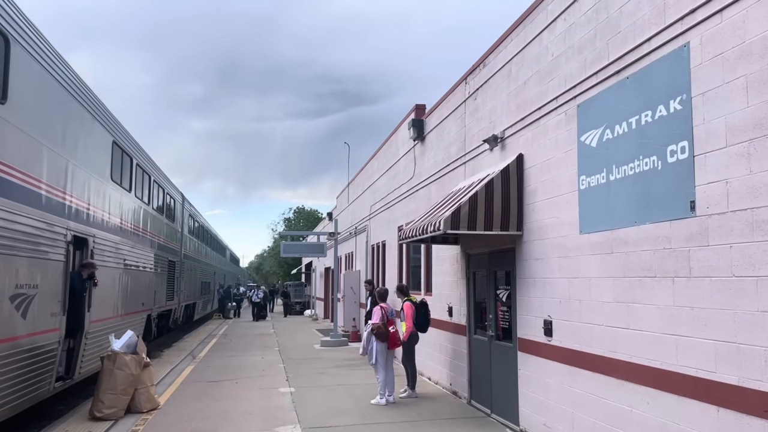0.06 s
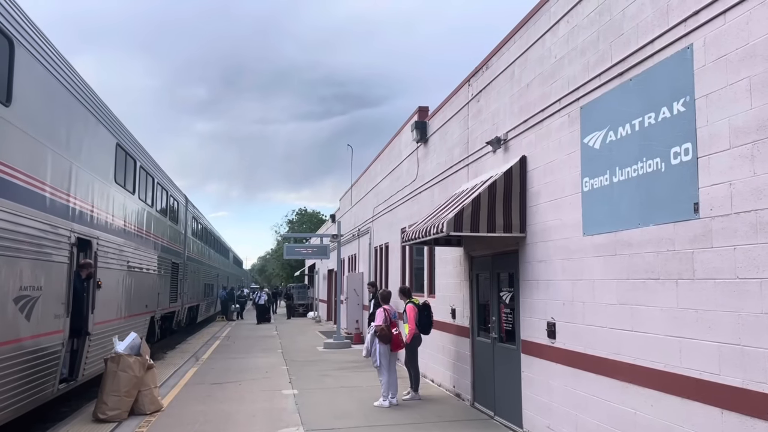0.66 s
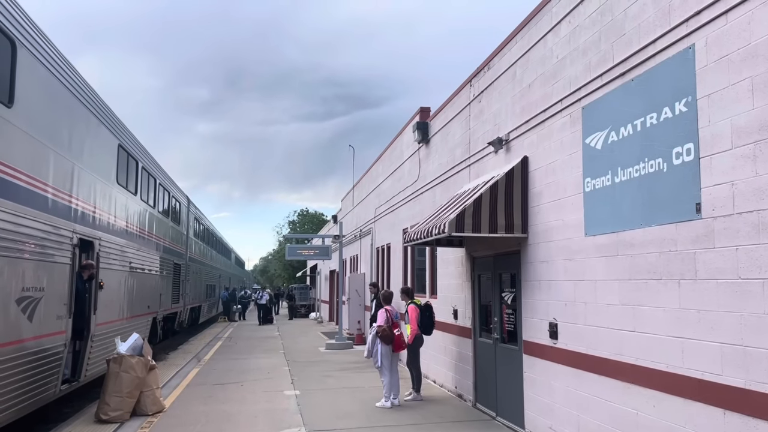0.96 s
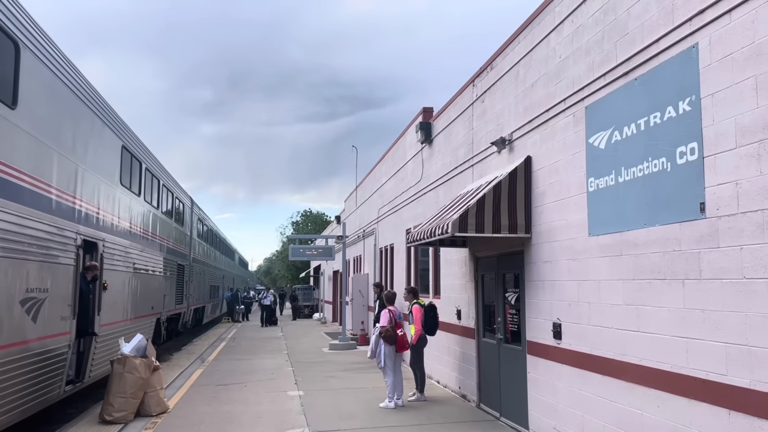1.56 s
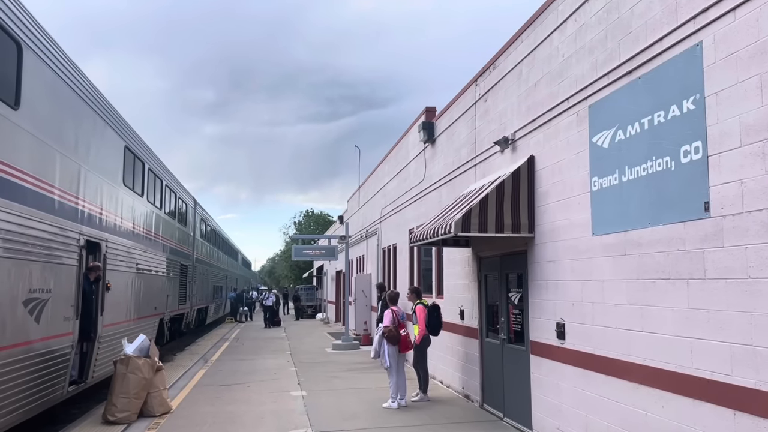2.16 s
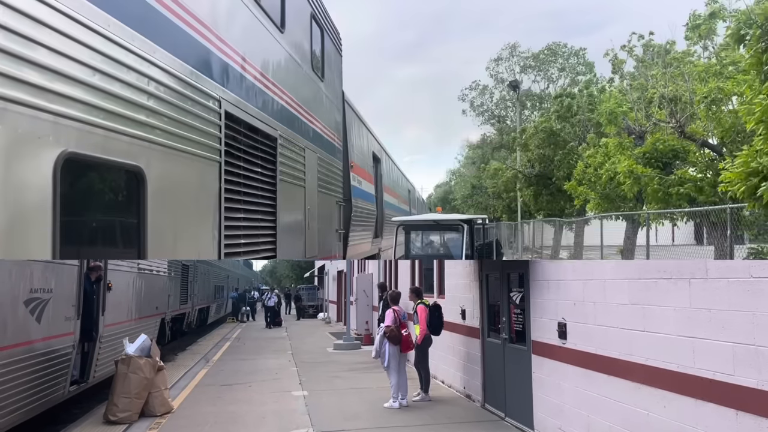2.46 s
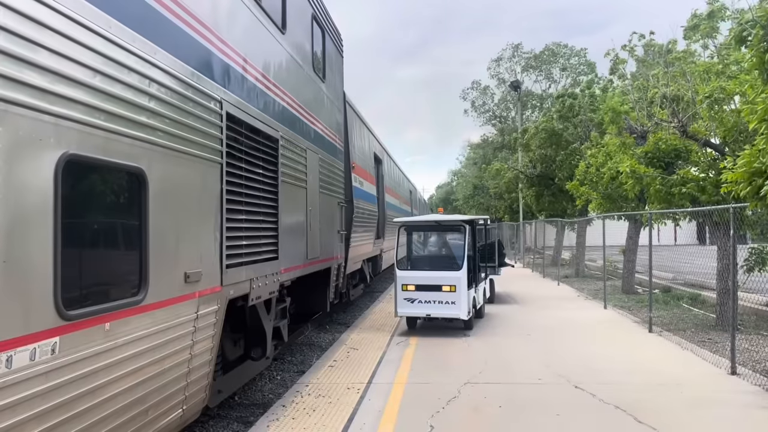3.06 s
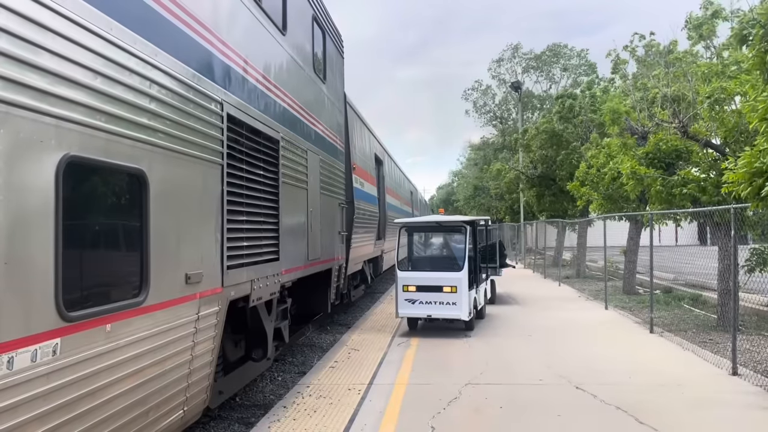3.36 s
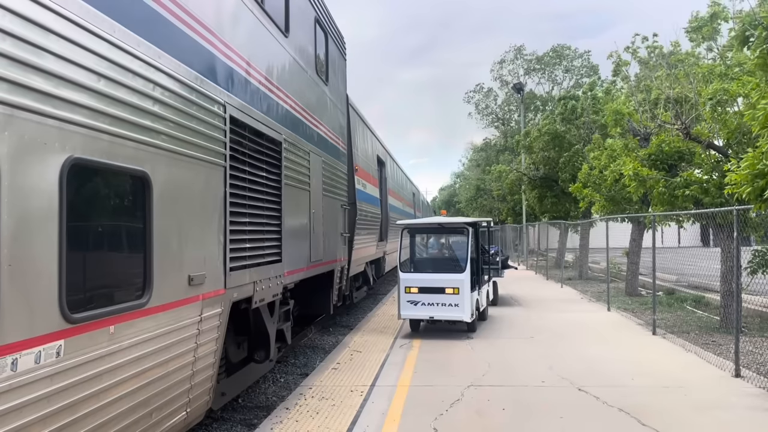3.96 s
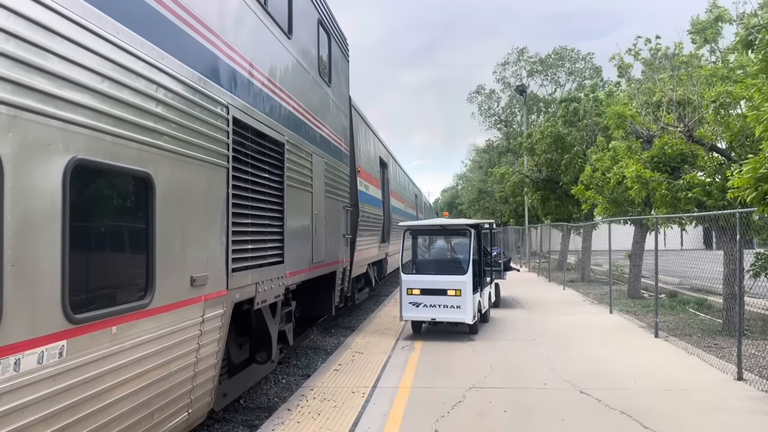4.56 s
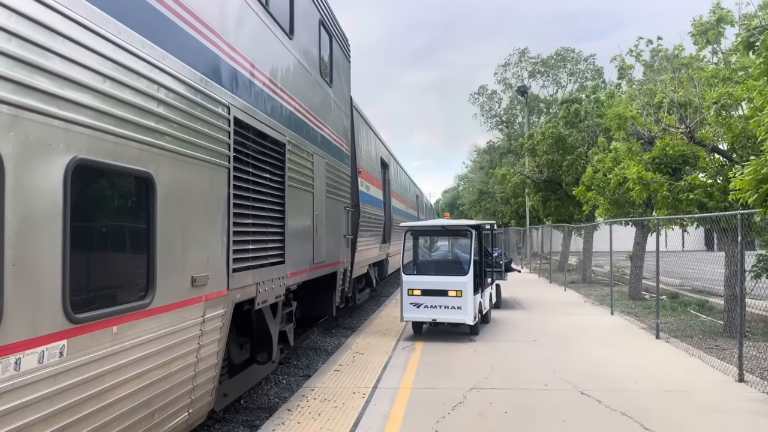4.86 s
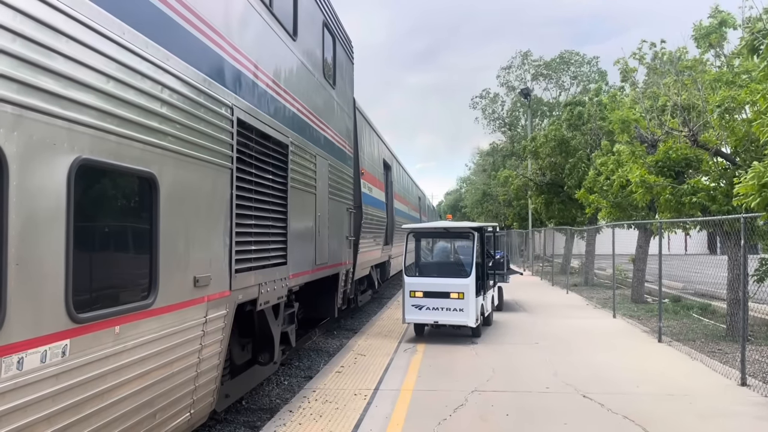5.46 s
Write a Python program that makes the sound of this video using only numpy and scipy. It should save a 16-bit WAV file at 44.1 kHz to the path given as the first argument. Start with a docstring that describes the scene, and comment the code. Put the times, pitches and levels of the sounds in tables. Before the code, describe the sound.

A train idles with roaring, droning blowers, giving way to a throbbing diesel engine and a brief run of metallic ratchet clicks.

```python
"""A passenger train idles at a platform, heard in stereo from two spots, one fading into the other.
Between the cars and the station wall, blowers roar and drone over a lumpy rumble with soft thuds.
Out in the open the diesel's exhaust orders beat into a throb, and fan blades whine in uneven air.
There, for a moment, something metal clicks like a ratchet: a pawl snaps over its teeth and rings,
and the side of the car throws each click back at the microphones."""
import sys
import numpy as np
from scipy import signal
from scipy.fft import rfft, irfft
from scipy.io import wavfile

SR = 44100
rng = np.random.default_rng(int(sys.argv[2]) if len(sys.argv) > 2 else 0)


def generate_wav(signal):
    """Clip the signal to [-1, 1] and save it as 16-bit WAV at the path in sys.argv[1]."""
    frames = np.transpose(np.atleast_2d(signal))
    scaled = np.clip(frames, -1, 1) * 32767
    pcm = np.round(scaled).astype(np.int16)
    wavfile.write(sys.argv[1], SR, pcm)


N = 243157
TIME, FREQS = np.arange(N) / SR, np.fft.rfftfreq(N, 1 / SR)

# how sound reaches the microphone pair by the wall and in the open:
# (frequency [Hz], likeness [0-1], left lead [rad], left minus right [dB])
WALL_MICS = [(50, 0.95, -0.2, 0.4), (200, 0.84, -0.2, 0.4), (400, 0.27, 0.1, 6.7), (750, 0.6, 2.3, 4.3),
             (1100, 0.74, 2.4, 1.3), (1400, 0.57, 3.0, -1.5), (1800, 0.16, 2.6, 2.7),
             (2400, 0.12, 3.8, 1.1), (3100, 0.5, 5.5, -0.6), (4500, 0.66, 6.5, -0.0), (5400, 0.3, 9.2, 0.8),
             (6500, 0.43, 11.8, -2.3), (8300, 0.7, 15.7, 0), (11000, 0.7, 18.8, 0)]
OPEN_MICS = [(50, 0.91, 0.0, -0.5), (300, 0.75, 0.2, 0.3), (420, 0.68, 0.5, -0.0), (550, 0.64, 1.2, 3.8),
             (950, 0.52, 1.2, 4.9), (1400, 0.08, -0.3, 3.5), (2000, 0.1, 0.3, 0.4), (3000, 0.23, 0.4, 1.7),
             (4500, 0.62, 0.3, 0.5), (5400, 0.36, 0.6, 1.6), (6300, 0.53, -0.6, 0.8), (8300, 0.7, -3.1, 0),
             (11000, 0.7, -6.3, 0)]


def diesel(cycle_hz=7.497):
    """Neighbouring exhaust orders beat into two uneven throbs a cycle; returns sound and envelope."""
    # exhaust orders: (multiple of the engine cycle, level [dB])
    orders = [(7, -41), (8, -36.5), (9, -25.5), (10, -33.3), (11, -21.4), (12, -32.5), (13, -33.3),
              (16, -43), (17, -38), (21, -42)]
    # strength of the engine: (time [s], gain [dB])
    strength = [(2.5, -5), (2.63, -1.3), (3.3, -1), (3.7, -2), (4.15, 0.3), (4.5, -.2), (5.25, 0.4),
                (5.5, -.5)]
    turns = .265 + np.cumsum(cycle_hz * (1 + .001 * drift(1.5))) / SR
    # the muffler delays each order by its distance from the loudest one, which spreads the throbs
    loudest, spread = 11, -.03
    exhaust = sum(gain_of(db) * np.exp(2j * np.pi * (order * turns + spread * (order - loudest) ** 2))
                  for order, db in orders)
    exhaust *= gain_of(curve(strength) + .9 * drift(10))  # no two firings are alike
    return np.sqrt(2) * exhaust.real * panned(-1), evened(abs(exhaust))


def engine_in_the_open(puff_floor=2.0):
    """Out in the open, each diesel throb pushes out a puff of rumble under the steady fans."""
    # fan and engine noise: (frequency [Hz], density [dB per Hz])
    spectrum = [(20, -75), (35, -56), (55, -42), (85, -42), (125, -47), (185, -56), (215, -52.5),
                (255, -53.5), (320, -57.5), (355, -53.5), (410, -60.5), (600, -64.5), (790, -60.5),
                (930, -66), (1020, -68), (1150, -70.5), (1500, -69), (1850, -73.5), (2200, -73),
                (2700, -78), (4600, -82.5), (5000, -84), (6000, -88), (10000, -99.5), (13500, -107.4)]
    # fan and motor tones: (frequency [Hz], width [Hz], level [dB], left minus right [dB])
    whine = [(238, 5, -40.5, 1.5), (269, 4, -37.7, 1.5), (538.3, 6, -45, 5), (951, 4, -53.5, 4),
             (1588, 6, -49.3, 3.5), (2143, 10, -59, 2), (2229, 30, -58, 2), (3650, 200, -60, 1),
             (4230, 130, -63, 0)]
    exhaust, throb = diesel()
    rumble, hiss = split(rush(spectrum, OPEN_MICS), hz=220)
    puffs = rumble * evened(puff_floor + throb)
    return exhaust + puffs + hiss + fan_tones(whine, OPEN_MICS, steadiness=.73)


def blowers_by_the_wall():
    """Between cars and wall, blower air roars over a lumpy rumble and surges now and then."""
    # fan and engine noise: (frequency [Hz], density [dB per Hz])
    spectrum = [(20, -58), (35, -71), (54, -38.5), (90, -40.5), (175, -45.5), (230, -50), (350, -49),
                (450, -52.5), (700, -53.5), (790, -58.5), (1020, -57.5), (1420, -67), (1680, -62),
                (2050, -65.5), (2600, -70), (4800, -76), (5800, -82.5), (10000, -96), (13500, -101.3)]
    # surges of the roar: (middle [s], half length [s], rise [dB])
    surges = [(0.71, 0.12, .7), (1.625, 0.055, 3.4), (1.7, 0.04, 1), (1.786, 0.033, 1), (2.02, 0.036, 2.8),
              (2.19, 0.04, 4), (2.265, 0.026, 3.5), (2.355, 0.045, 4)]
    # slow changes in the hiss: (time [s], gain [dB])
    hiss_gain = [(0, .5), (.9, 1), (1.35, -0.5), (1.75, 0.5), (1.95, -0.5), (2.15, -0.3), (2.35, -2.5),
                 (2.55, 1)]
    low, hiss = split(rush(spectrum, WALL_MICS), hz=1200)
    rumble, roar = split(low, hz=260)
    roar += rumble * flutter(depth=.35, rate_hz=9.3)
    roar_db = 2.16 + sum(db * np.exp(-((TIME - s) / length) ** 4) for s, length, db in surges)
    # the drone follows most of each surge, the hiss very little
    drone = blower_drone() * gain_of(.71 * roar_db)
    hiss *= gain_of(curve(hiss_gain) + .082 * roar_db)
    return roar * gain_of(roar_db) + hiss + drone


def blower_drone():
    """By the wall the big blower hums on a close, fluttering pair of tones among lesser ones."""
    # the big blower, then lesser blowers and motors:
    # (frequency [Hz], width [Hz], level [dB], left minus right [dB])
    hum_tones = [(291.5, 12, -25.2, 5.5), (309, 16, -34, 1.5)]
    lesser_tones = [(82.5, 1.2, -27.5, 0.1), (263, 10, -36.5, 4), (402.5, 2.5, -35.5, 8), (513, 10, -38, 6),
                    (545, 24, -38.5, 4), (632, 22, -41.5, 4), (690, 40, -37.5, 2.5), (803, 5, -43, 1.5),
                    (1060, 16, -48, 1), (1285, 60, -51, 0), (1819, 18, -43.3, 4)]
    hum = fan_tones(hum_tones, WALL_MICS, steadiness=0) * flutter(depth=.55, rate_hz=11.5)
    return hum + fan_tones(lesser_tones, WALL_MICS, steadiness=.033)


def fan_whirr():
    """The fans by the wall whirr in high, metallic bands, roughened by a fast flutter."""
    # whirr bands: (frequency [Hz], width [Hz], level [dB], left minus right [dB])
    bands = [(1690, 130, -45.5, 3), (1940, 110, -46.3, 3), (2130, 170, -45, 2), (2390, 50, -54, 2),
             (2960, 60, -56, 0), (3130, 30, -56, 0), (3301, 35, -56, 0), (3620, 120, -55, 0),
             (4400, 70, -58, 0), (4950, 160, -59, 0), (6350, 500, -62, -2)]
    # swell of the whirr: (time [s], gain [dB])
    swell = [(0, .7), (1.5, .3), (1.7, 2), (1.9, 1.5), (2.13, 3.5), (2.33, 1), (2.55, 2)]
    whirr = fan_tones(bands, WALL_MICS, steadiness=0) * flutter(depth=.5, rate_hz=45)
    return whirr * gain_of(curve(swell))


def rush(spectrum, mics, ripple_db=1.7, spacing_hz=28):
    """Turbulent air and engine rumble; reflections leave fine, fixed peaks and dips in its colour."""
    knots = np.arange(0, SR / 2, spacing_hz)
    ripple = np.array([np.interp(FREQS, knots, row[:len(knots)]) for row in rng.standard_normal((2, N))])
    ripple = (ripple + ripple.sum(0)) / np.sqrt(5)  # partly shared by the microphones
    depth_db = ripple_db * FREQS / (FREQS + 500)  # long waves are hardly combed
    colour = gain_of(columns_at(spectrum, FREQS)[0] + depth_db * ripple) * np.sqrt(SR / 2)
    balance_db = columns_at(mics, FREQS)[2]
    return irfft(mic_pair(mics) * colour * panned(balance_db), N)


def fan_tones(table, mics, steadiness):
    """Fan blades in uneven air: lines that wander in phase and, the less steady, waver in level."""
    out, pair = np.zeros((2, N)), mic_pair(mics)
    for hz, width, db, balance_db in table:
        band = np.fft.ifft(pair / np.sqrt(1 + ((FREQS - hz) / (.5 * width)) ** 4), N)
        line = band.real / (abs(band) + 1e-12) ** steadiness
        out += gain_of(db) * panned(balance_db) * np.array([evened(side) for side in line])
    return out


def ratchet(echo_s=.0105, echo_db=-.5):
    """The pawl clicks over its teeth, heavy and light by turns; the car side throws each click back."""
    # clicks: (time [s], level [dB], tilt to the upper modes [dB per octave], relative crack level [dB])
    clicks = [(2.849, -37, 18, -2), (2.917, -31, 20, -13), (3.0217, -26, -1, -11), (3.0997, -30, 16, -10),
              (3.195, -30, -6, -13), (3.276, -33, 11, -6), (3.37, -27, 1, -6), (3.45, -31, 17, -10),
              (3.548, -41, -3, -10), (3.627, -32, 12, -7), (3.722, -32, -2, -12), (3.803, -33, 6, -8),
              (3.892, -28.7, 3, -10), (3.984, -33, 11, -13), (4.0766, -30.3, 0, -10), (4.153, -31.5, 5, -9)]
    out = np.zeros((2, N))
    for s, db, tilt_db, crack_db in clicks:
        for delay, path_db in ((0, 0), (echo_s, echo_db)):
            add(out, s + delay, gain_of(db + path_db) * click(tilt_db, crack_db))
    return out


def click(tilt_db, crack_db, crack_t60=.021, snap_s=.0005, attack_s=.0006):
    """The pawl hits a tooth: a bright snap at first contact, a dry crack and a ring."""
    # colour of the crack: (frequency [Hz], relative level [dB])
    spectrum = [(1500, -25), (2600, -12), (3300, -2), (4100, -8), (4900, 0), (6000, -10), (7200, -12),
                (9000, -25), (11500, -28), (13500, -35)]
    t = TIME[:SR // 5]
    colour = gain_of(columns_at(spectrum, np.fft.rfftfreq(len(t), 1 / SR))[0])
    noise = evened(irfft(rfft(rng.standard_normal(len(t))) * colour, len(t)))
    crack = gain_of(crack_db - 60 * t / crack_t60) * panned(-1) * noise
    snap = gain_of(crack_db - 7) * rng.standard_normal(len(t)) * np.exp(-t / snap_s)
    ring = gain_of(-4.5) * panned(-7) * pawl_ring(t, tilt_db)
    return snap + (crack + ring) * (1 - np.exp(-t / attack_s))


def pawl_ring(t, tilt_db):
    """The loose pawl's modes chatter and sag, a little differently at every tooth."""
    # modes of the pawl: (frequency [Hz], relative level [dB], t60 [s])
    modes = [(3100, 0, 0.03), (3330, -14, .22), (3317, 2.5, 0.052), (3430, -3, 0.05), (3750, -4.5, 0.03),
             (4200, -10, .05), (4680, -3.5, 0.045), (5130, -10, .03), (6380, -19, 0.05)]
    sag, sag_s = .035, .007  # each ring starts this share sharp and settles this fast
    rattle_depth, rattle_hz = .35, 260
    detune, uneven_db, left_lead_rad = .008, 1.5, 1.9
    pivot_hz, tilt_top_hz = 4200, 5130
    sagging = t + sag * sag_s * (1 - np.exp(-t / sag_s))
    knots = np.arange(0, t[-1], .5 / rattle_hz)
    ring = np.zeros((2, len(t)))
    for hz, db, t60 in modes:
        pitch, strength = rng.standard_normal(2)
        chatter = rattle_depth * rng.standard_normal((2, len(knots)))
        shake, slip = (np.interp(t, knots, row) for row in chatter)
        angle = 2 * np.pi * (hz * (1 + detune * pitch) * sagging + rng.random()) + slip
        level_db = db + tilt_db * np.log2(min(hz, tilt_top_hz) / pivot_hz) + uneven_db * strength
        ring += gain_of(level_db - 60 * t / t60) * (1 + shake) * np.sin([angle, angle - left_lead_rad])
    return ring


def fine_hiss(centre_hz=9000, half_width_hz=4000):
    """A soft, high hiss that goes with the ratchet and swells as it stops."""
    # course of the hiss: (time [s], level [dB])
    levels = [(2.7, -80), (2.95, -63), (3.95, -62.5), (4.1, -64), (4.17, -57.5), (4.26, -68), (4.4, -90)]
    band = irfft(mic_pair(OPEN_MICS) * bell(FREQS, centre_hz, half_width_hz), N)
    return evened(band) * gain_of(curve(levels))


def thuds(half_width_hz=63):
    """Soft, low thuds within the rumble, alike at both microphones."""
    # thuds: (middle [s], half length [s], pitch [Hz], level [dB])
    events = [(.487, .015, 175, -20), (.738, .022, 85, -16), (.885, .015, 165, -20.5),
              (.98, .025, 112, -17.5), (1.695, .03, 72, -16), (1.79, .022, 90, -13.5),
              (2.178, .012, 130, -14.5), (2.282, .022, 75, -16), (2.365, .02, 80, -17),
              (2.79, .018, 135, -25), (4.255, .016, 150, -16.5)]
    out = np.zeros(N)
    for s, length, hz, db in events:
        body = irfft(rfft(rng.standard_normal(N)) * bell(FREQS, hz, half_width_hz), N)
        swell = bell(TIME, s, length)
        thud = body * swell
        out += gain_of(db) * thud * np.linalg.norm(swell) / np.linalg.norm(thud)
    return out


def platform_scatter(x, wet_db=-6, t60=.22):
    """Adds short scatter from the cars, the ground and the fence."""
    t = TIME[:SR // 2]
    tail = rng.standard_normal((2, len(t))) * gain_of(-60 * t / t60) * (t > .004)
    tail /= np.linalg.norm(tail[0])
    return x + gain_of(wet_db) * signal.fftconvolve(x, tail, axes=1)[:, :N]


def mic_pair(mics):
    """Spectra of white noise at the two microphones, partly alike and shifted in phase."""
    likeness, lead, _ = columns_at(mics, FREQS)
    left, other = rfft(rng.standard_normal((2, N)))
    right = likeness * left + np.sqrt(1 - likeness ** 2) * other
    return np.array([left, right * np.exp(-1j * lead)])


def flutter(depth, rate_hz):
    """An uneven beat in loudness, of unit rms."""
    turns = rng.random() + np.cumsum(rate_hz * (1 + .25 * drift(6))) / SR
    return evened(1 + depth * np.sin(2 * np.pi * turns))


def drift(rate_hz):
    """Slow random wandering of unit rms."""
    return evened(irfft(rfft(rng.standard_normal(N)) * bell(FREQS, 0, rate_hz), N))


def split(x, hz):
    """The low and the high part of a sound."""
    low = irfft(rfft(x) / (1 + (FREQS / hz) ** 2), N)
    return low, x - low


def columns_at(table, hz):
    """Each column of a table at the given frequencies, on a log axis."""
    knots, *columns = np.transpose(table)
    return [np.interp(np.log(hz + 1), np.log(knots + 1), column) for column in columns]


def curve(points):
    """Straight lines through (time, value) points, at every sample."""
    return np.interp(TIME, *np.transpose(points))


def bell(x, centre, half_width):
    """A Gaussian hump of height one."""
    return np.exp(-((x - centre) / half_width) ** 2)


def panned(balance_db):
    """Left and right gains for a level difference."""
    return gain_of(np.array([[.5], [-.5]]) * balance_db)


def gain_of(db):
    """Decibels to amplitude."""
    return 10 ** (np.asarray(db) / 20)


def evened(x):
    """Scales to unit rms."""
    return x / np.sqrt(np.mean(x ** 2) + 1e-20)


def add(mix, s, sound):
    """Adds a stereo sound to the mix at time s."""
    part = mix[:, round(s * SR):][:, :sound.shape[1]]
    part += sound[:, :part.shape[1]]


def scene():
    """The spot by the wall fades into the spot in the open; thuds run through both."""
    fade = np.interp(TIME, (2.2, 2.745), (0, 1))
    wall = blowers_by_the_wall() + fan_whirr()
    open_air = engine_in_the_open() + platform_scatter(ratchet()) + fine_hiss()
    return (1 - fade) * wall + fade ** .74 * open_air + thuds()


def record(dry):
    """The recorder's band limit."""
    lowpass = signal.firwin(511, cutoff=13700, window=("kaiser", 9), fs=SR)
    return signal.oaconvolve(dry, lowpass[None], "same")


dry = scene()
out = record(dry)
generate_wav(out)
```